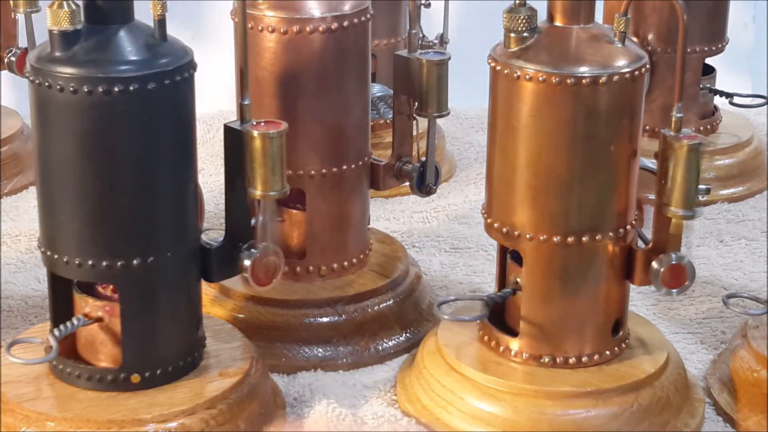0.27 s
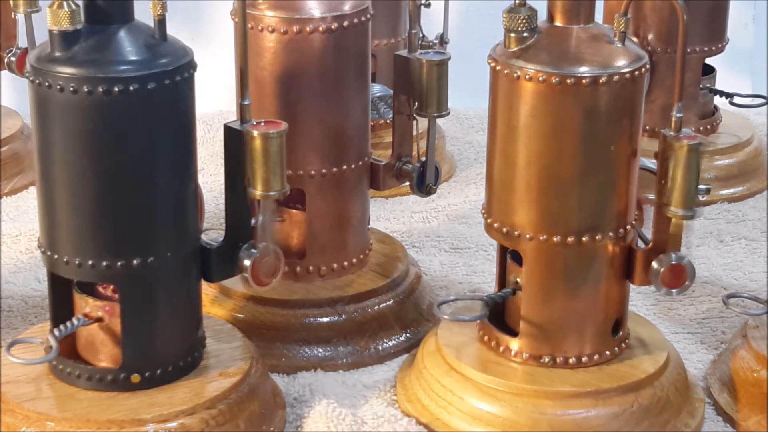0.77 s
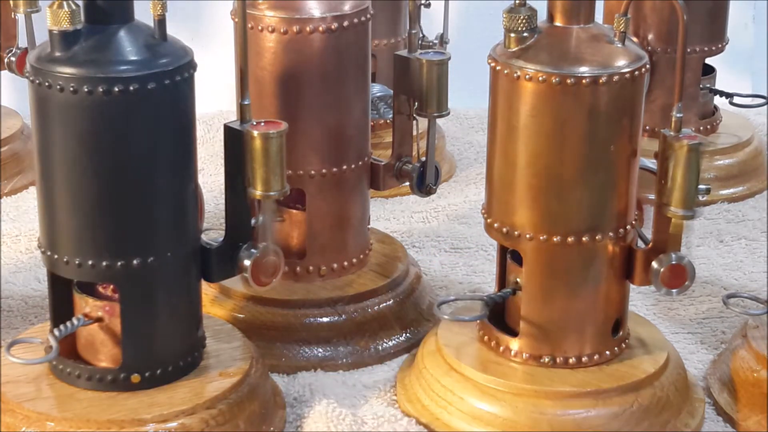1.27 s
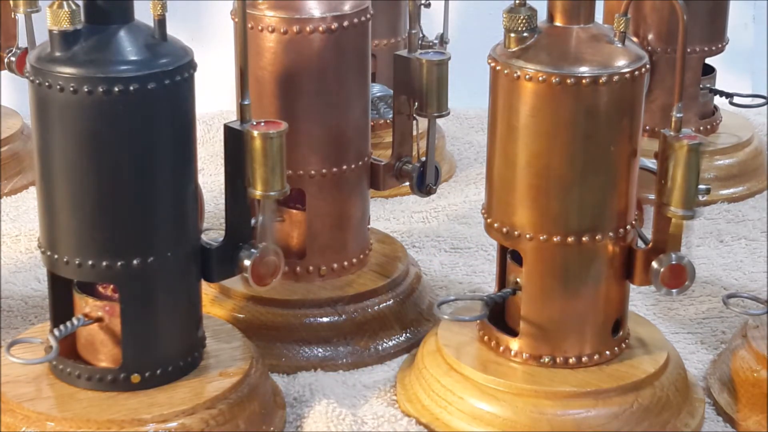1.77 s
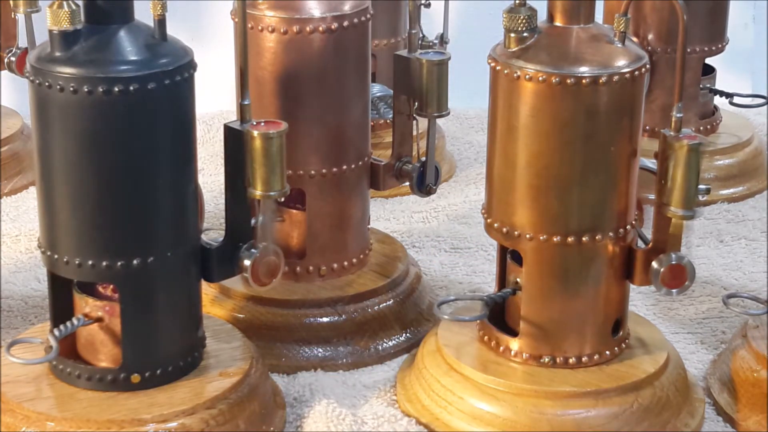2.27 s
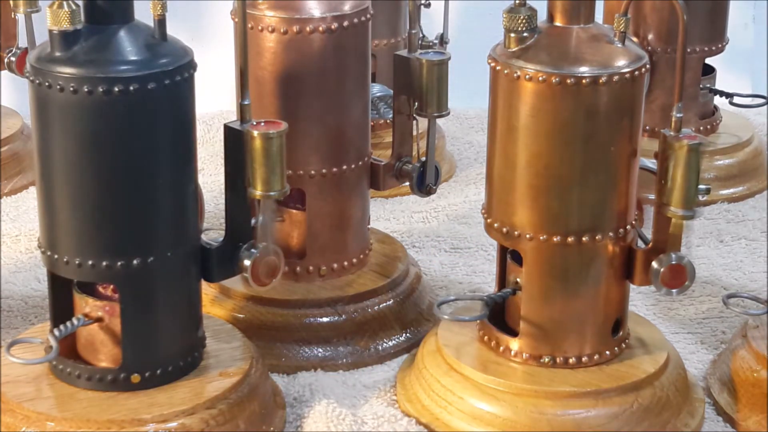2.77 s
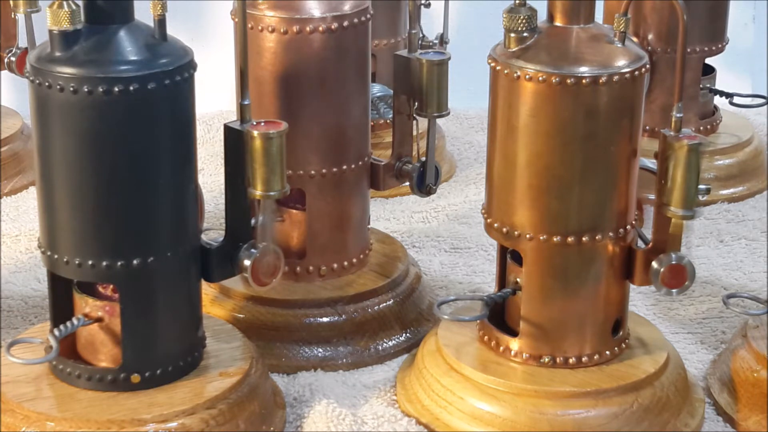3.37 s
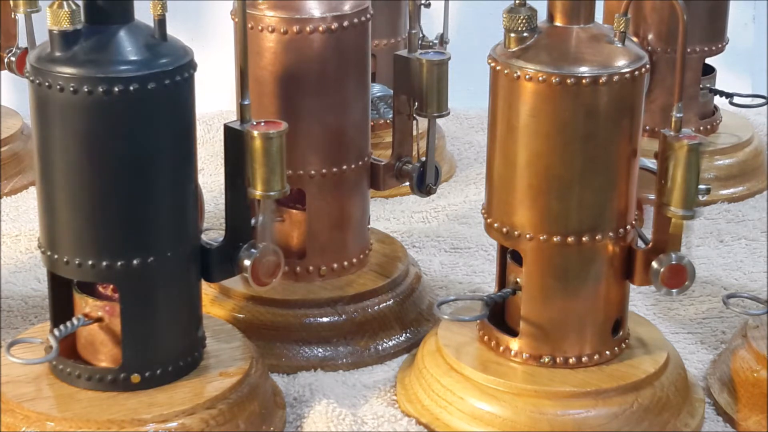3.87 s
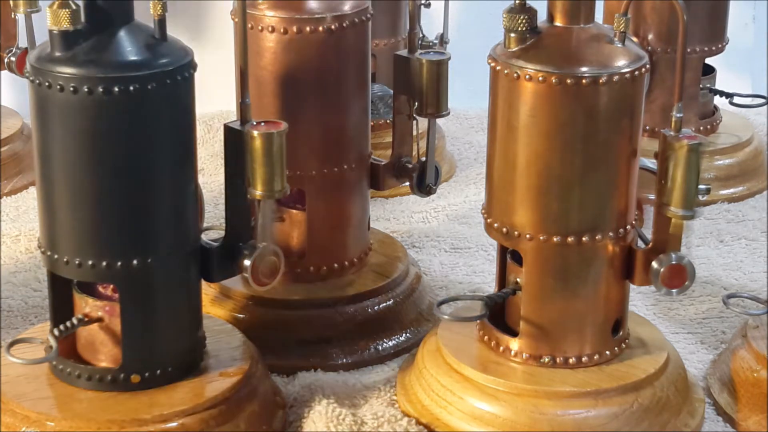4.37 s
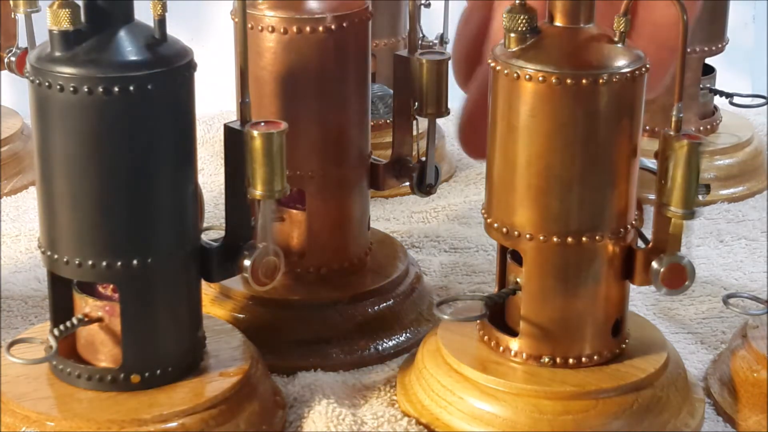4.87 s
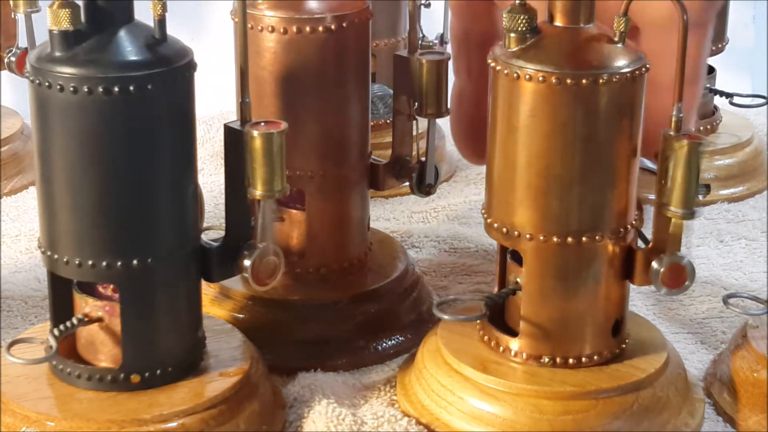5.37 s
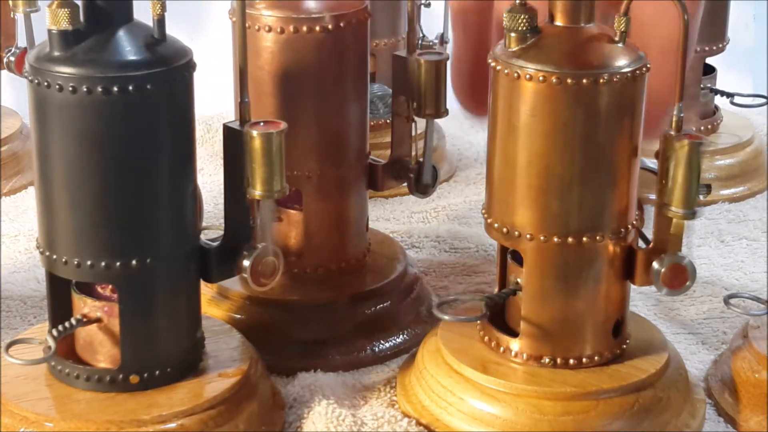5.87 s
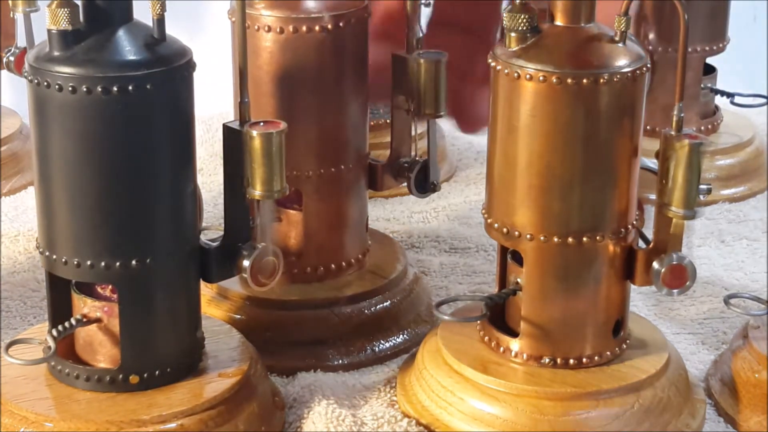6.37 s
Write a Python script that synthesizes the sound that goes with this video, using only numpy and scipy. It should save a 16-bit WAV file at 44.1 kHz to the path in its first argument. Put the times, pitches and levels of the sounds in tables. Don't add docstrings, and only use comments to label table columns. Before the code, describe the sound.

Small model steam engines hiss and sputter steadily with a rapid metallic chatter, while nearby hands click, snap, knock and drag parts on a table.

```python
import sys
import numpy as np
from scipy import signal
from scipy.fft import rfft, irfft
from scipy.io import wavfile
from scipy.ndimage import uniform_filter1d

SR = 44100
rng = np.random.default_rng(int(sys.argv[2]) if len(sys.argv) > 2 else 0)


def decibels_to_gain(level_db):
    exponent = np.asarray(level_db, float) / 20
    return 10 ** exponent


def int16_out(signal):
    q = np.round(np.clip(np.atleast_2d(signal).T, -1, 1) * 32767)
    wavfile.write(sys.argv[1], SR, q.astype(np.int16))


N = 292540


def evened(x):
    return x / np.sqrt(np.mean(x ** 2) + 1e-20)


def read(points, hz):
    f, value = np.transpose(points)
    return np.interp(np.log(hz + 1), np.log(f + 1), value, value[0] - 20, value[-1] - 20)


def follow(rows):
    s, *columns = np.transpose(rows)
    return [np.interp(np.arange(N) / SR, s, c) for c in columns]


def add(mix, s, sound):
    part = mix[round(s * SR):][:len(sound)]
    part += sound[:len(part)]


def ring(x, hz, width_hz):
    return signal.lfilter(*signal.iirpeak(hz, hz / max(width_hz, 10), SR), x)


def steep(x, hz, width_hz):
    y = ring(ring(ring(x, hz, width_hz), hz, width_hz), hz, width_hz)
    return y / abs(y).max()


def filtered(x, order, hz, kind="low"):
    return signal.sosfilt(signal.butter(order, hz, kind, fs=SR, output="sos"), x)


def colour(points):
    log_gain = np.log(decibels_to_gain(read(points, abs(np.fft.fftfreq(4096, 1 / SR)))))
    minimum_phase = np.exp(np.conj(signal.hilbert(log_gain)))
    taps = np.fft.ifft(minimum_phase).real[:2048]
    return taps / abs(taps).max()


def noise(points, patchy_db):
    a, b, patches = rng.standard_normal((N // 128 + 6, 257, 3)).T
    patches = evened(uniform_filter1d(uniform_filter1d(patches, 6, 0), 16, 1))
    slow_bands = uniform_filter1d(rng.standard_normal(a.shape), 3, 0)
    patches += evened(uniform_filter1d(slow_bands, 200, 1))
    hz = np.fft.rfftfreq(512, 1 / SR)
    z = (a + 1j * b) * decibels_to_gain(read(points, hz)[:, None] + patchy_db * patches)
    return evened(signal.istft(z, nperseg=512, noverlap=384)[1][:N])


def pops(spread_db):
    strength = decibels_to_gain(spread_db * np.minimum(rng.exponential(1, N), 4))
    return strength * (rng.random(N) < 900 / SR) * rng.choice([-1, 1], N)


def stroke(s, db, rise_s, fall_s):
    t = np.arange(0, N / SR, .001) - s
    far = np.where(t < 0, -t / max(rise_s, .003), t / max(fall_s, .003))
    return decibels_to_gain(db - 30 * far ** 1.2)


def strokes(rows):
    level = np.sqrt(sum(stroke(*row) ** 2 for row in rows))
    return np.interp(np.arange(N) / SR, np.arange(len(level)) * .001, level)


def turns(engine):
    start, speed = engine
    return start + np.cumsum(follow(speed)[0]) / SR


PUFFER = -.234, [(0, 29.99), (6.64, 31.414)]
WHEEZER = .088, [(0, 19.204), (4.5, 18.957), (6.64, 19.606)]
# time_s, level_db, puff_swell_db, wheeze_swell_db
STEAM = [(0, -53, 1, 2), (.5, -52, 6.5, 7.5), (.9, -52, 8.5, 6.5), (1.65, -52.5, 3.5, 3.5),
         (2.3, -50.5, 5, 3.5), (2.9, -50, 3.5, 0.5), (4.3, -51, 3.5, 6.5), (4.5, -50.5, 6.5, 5.5),
         (5.85, -52, 4, 5), (6.3, -50.5, 6, 5.5), (6.63, -52.5, 7, 5)]
# pitch_hz, level_db [per Hz]
HISS = [(900, -18), (1300, -31.5), (1650, -21), (2400, -19.5), (3400, -20.5), (4000, -24.5), (5400, -30.5),
        (6400, -22.5), (7200, -9), (8100, 1), (9200, -8.5), (11400, -21), (13800, -28.5), (15900, -22)]
# pitch_hz, width_hz, level_db
RIDGES = [(1603, 56, 7), (3380, 350, 1.5), (4860, 580, 6.5), (5880, 180, 5), (5850, 140, -2)]


def steam():
    level_db, puff_db, wheeze_db = follow(STEAM)
    droplets = pops(spread_db=4)
    hiss = noise(HISS, patchy_db=1.4)
    sputter = ring(signal.oaconvolve(droplets, colour(HISS))[:N], 8200, 3000)
    hiss = hiss + decibels_to_gain(-3) * evened(sputter)
    hiss = hiss + sum((decibels_to_gain(db) - 1) * ring(hiss, hz, width_hz) for hz, width_hz, db in RIDGES)
    puff = np.exp(2.5 * (np.cos(2 * np.pi * turns(PUFFER)) - 1))
    wheeze = np.exp(1.8 * (np.cos(2 * np.pi * turns(WHEEZER)) - 1))
    low = ring(ring(hiss, 7880, 1700), 7880, 1700) * (decibels_to_gain(puff_db * puff) - 1)
    high = ring(ring(hiss, 9760, 2500), 9760, 2500) * (decibels_to_gain(wheeze_db * wheeze) - 1)
    return decibels_to_gain(level_db) * evened(filtered(hiss + low + high, 12, 15850))


KNOCKER = -.107, [(0, 24.757), (1.8, 25.732), (3, 26.08), (5.4, 26.306), (6.64, 26.032)]
# time_s, peak_db
KNOCK = [(0, -33), (.3, -37.5), (.9, -40.5), (1.45, -34), (2.0, -35), (2.6, -38.5), (2.95, -35.5),
         (3.5, -36.5), (3.65, -31.5), (3.8, -36.5), (4.1, -40), (4.9, -34.5), (5.6, -36.5), (6.25, -33),
         (6.63, -34)]
# start_s, peak_db
ODD_KNOCKS = [(.964, -42), (1.003, -40), (1.043, -35), (1.082, -44), (1.122, -46), (1.24, -39),
              (1.279, -34), (1.436, -33), (1.631, -32), (1.709, -38), (1.942, -38), (2.02, -32),
              (2.059, -41), (2.097, -40), (2.136, -34), (2.214, -43), (2.6, -33), (2.869, -34),
              (2.945, -38), (3.137, -38), (3.176, -31), (3.252, -34), (3.405, -43), (3.597, -32),
              (3.673, -28), (3.711, -30), (4.055, -44), (4.132, -46), (4.17, -43), (4.208, -44),
              (4.285, -34), (4.323, -32), (4.437, -32), (4.628, -40), (4.666, -33), (4.704, -31),
              (4.742, -40), (4.78, -40), (4.856, -32), (4.895, -31), (4.971, -32), (5.123, -39),
              (5.465, -44), (5.503, -33), (5.541, -33), (5.694, -42), (5.884, -32), (5.923, -31),
              (5.961, -38), (5.999, -43), (6.114, -41), (6.152, -36), (6.19, -31), (6.267, -37),
              (6.305, -31), (6.343, -31), (6.382, -35), (6.42, -32), (6.458, -37), (6.573, -32)]
# pitch_hz, level_db [per Hz]
KNOCK_RING = [(900, -46), (2500, -33), (4600, -28), (5600, -34), (6600, -24), (7300, -7), (7950, 0),
              (8550, -9), (9400, -28), (13000, -48), (20000, -55)]


def knocks():
    at = np.flatnonzero(np.diff(np.floor(turns(KNOCKER))))
    size, shift, bounce, lag = rng.standard_normal((len(at), 4)).T
    hits = np.zeros(N + 400)
    level_db = follow(KNOCK)[0][at] + 1.2 + 1.2 * size
    s, odd_db = np.transpose(ODD_KNOCKS)
    nearest = abs(at[:, None] / SR - s).argmin(axis=0)
    level_db[nearest] = odd_db - 0.5
    at = np.clip(at - 18 + (4 * shift).astype(int), 0, N - 1)
    peak = decibels_to_gain(level_db)
    hits[at] += peak
    rebound_at = at + np.clip(75 + 30 * lag, 25, 300).astype(int)
    hits[rebound_at] += peak * decibels_to_gain(-12 + 3 * bounce)
    return ring(signal.oaconvolve(hits, colour(KNOCK_RING))[:N], 7800, 3600)


# pitch_hz, t60_s
ROOM = [(150, 0.14), (600, 0.19), (2000, 0.21), (5000, 0.21), (9000, 0.15), (12000, 0.17), (16000, 0.37)]


def room_tail():
    taps = np.zeros(SR // 2)
    at = np.arange(40, len(taps) - 20, 12)
    at = at + rng.integers(0, 12, len(at))
    taps[at] = rng.choice([-1., 1.], len(at))
    hz, t, z = signal.stft(taps, SR, nperseg=256)
    room_hz, room_s = np.transpose(ROOM)
    t60 = np.interp(np.log(hz + 1), np.log(room_hz), room_s)
    tail = signal.istft(z * decibels_to_gain(-60 * t / t60[:, None]), SR, nperseg=256)[1]
    tail *= np.minimum(.55 + np.arange(len(tail)) / SR / .035, 1)
    tail = filtered(tail, 14, 15800)
    return tail / np.linalg.norm(tail)


def struck(direct, room_db, wall_db):
    out = decibels_to_gain(room_db) * signal.fftconvolve(direct, room_tail())
    add(out, 0, direct)
    add(out, .0143, decibels_to_gain(wall_db) * direct)
    return out


# start_s, peak_db, body_db, room_db
SNAPS = [
    (3.9063, -4.5, -20, -5.5),
]
# pitch_hz, level_db [per Hz]
SNAP_TOP = [(3290, -59), (5600, -30), (6440, -19), (8150, 3.5), (9380, 10), (11300, -18), (13600, -25),
            (15300, -17), (16000, -36), (16500, -36)]
# pitch_hz, level_db [per Hz]
SNAP_BODY = [(240, -7), (400, -1.5), (786, 1.5), (1100, -3), (1210, 1), (1690, 1.5), (2200, 4), (3500, 2.5),
             (5200, -7), (6760, -5), (11400, -120)]


def snaps():
    out = np.zeros(N)
    for s, top_db, body_db, room_db in SNAPS:
        add(out, s, struck(decibels_to_gain(top_db) * colour(SNAP_TOP), room_db, wall_db=-9))
        add(out, s, struck(decibels_to_gain(body_db + 4.5) * colour(SNAP_BODY), room_db=-1, wall_db=-8))
    return out


def metal_taps(rows, top, wall_db):
    out = np.zeros(N)
    for s, top_db, body_db, hz, room_db in rows:
        body = steep(signal.unit_impulse(2048), hz, .85 * hz)
        blow = decibels_to_gain(top_db) * top + decibels_to_gain(body_db + 5.5) * body
        add(out, s + 0.0014, struck(blow, room_db, wall_db))
    return out


# start_s, peak_db, body_db, body_hz, room_db
TICKS = [
    (5.695, -60, -58, 1080, -11),
    (5.6955, -34.5, -50, 2700, -5),
    (5.9023, -31.5, -51, 2920, -6.5),
    (6.2813, -28.5, -55, 2420, -6),
]
# pitch_hz, level_db [per Hz]
TICK = [(3530, -51), (6000, -14), (7260, -43), (8280, 15), (8860, 16), (15000, -21), (16500, -38)]


def ticks():
    return metal_taps(TICKS, colour(TICK), wall_db=-22)


# start_s, peak_db, body_db, body_hz, room_db
CLICKS = [
    (0.3148, -46, -45.5, 1650, -10),
    (0.319, -33, -47.5, 2060, -8),
    (0.3252, -43, -68, 1910, -12),
    (0.332, -45, -67, 2430, -10.1),
    (0.3538, -27.5, -51.5, 1420, -26),
    (0.5252, -40, -54, 4100, -15),
    (0.5941, -35, -50, 5130, -16),
]


def clicks():
    return metal_taps(CLICKS, steep(colour(HISS), 8200, 5000), wall_db=-21)


# start_s, peak_db, room_db
FLICKS = [
    (6.283, -22, -24),
]


def flicks():
    out = np.zeros(N)
    for s, db, room_db in FLICKS:
        add(out, s, struck(decibels_to_gain(db) * steep(signal.unit_impulse(512), 10200, 7900), room_db, wall_db=-28))
    return out


# start_s, peak_db, room_db
CLACKS = [
    (3.21, -16, 1),
    (3.2122, -28, -11),
    (3.2183, -22, -5),
]
# pitch_hz, level_db [per Hz]
CLACK = [(88, -37), (150, -25), (288, -27.5), (341, -14.5), (465, -13), (777, -23), (1740, -5.5),
         (2130, -15.5), (3760, -26.5), (5570, -41), (6960, -43), (8260, -18), (9000, -30), (11700, -39),
         (19800, -120)]


def clacks():
    out = np.zeros(N)
    for s, db, room_db in CLACKS:
        add(out, s, struck(decibels_to_gain(db) * ring(colour(CLACK), 1470, 5600), room_db, wall_db=-38))
    return out


# pitch_hz, level_db, t60_s
CLACK_RING = [(1270, -13, 0.18), (1420, 0, 0.24), (1670, 3, 0.17), (1800, -1, 0.15), (1890, -4, 0.14),
              (2245, -14, 0.28), (2440, -15, 0.17)]


def clack_body():
    out, t = np.zeros(N), np.arange(SR // 4) / SR
    body = sum(decibels_to_gain(db - 60 * t / t60) * np.sin(2 * np.pi * (hz * t + rng.random()))
               for hz, db, t60 in CLACK_RING)
    add(out, CLACKS[0][0], decibels_to_gain(-52) * np.minimum(t / .006, 1) * body)
    return out


# start_s, peak_db, pitch_hz, room_db
THUDS = [(0.524, -55.5, 870, -17), (2.765, -58.5, 145, 10), (3.323, -42, 226, -2.5),
         (3.454, -63, 190, 15.5), (3.545, -26, 448, -1), (3.555, -38.5, 531, 7), (3.68, -49, 398, 0),
         (3.683, -56, 1020, -12), (3.741, -54, 455, 4), (3.743, -53, 1110, -1), (3.776, -47, 295, -20),
         (3.957, -50, 338, 6), (4.495, -39, 346, -5), (4.514, -35, 307, 2), (4.581, -27.5, 340, 7),
         (4.612, -37.5, 1063, -3), (4.605, -24, 758, -3.5)]
# start_s, peak_db, pitch_hz, room_db
BONKS = [
    (3.840, -37, 325, -6.5),
    (3.868, -45, 329, -5),
]


def thuds():
    out = np.zeros(N)
    for rows, width_hz in ((THUDS, 206), (BONKS, 51)):
        for s, db, hz, room_db in rows:
            blow = decibels_to_gain(db) * steep(signal.unit_impulse(4000), hz, width_hz)
            add(out, s, struck(blow, room_db, wall_db=-24))
    return out


# start_s, peak_db, pitch_hz, width_hz
BLIPS = [(3.1515, -46.5, 900, 1300), (3.168, -48, 1200, 900), (3.2265, -35, 1800, 450),
         (3.234, -30, 1450, 500), (3.239, -34, 1570, 600), (3.248, -42, 1600, 500),
         (3.5555, -32, 594, 170), (3.583, -39, 594, 200), (3.682, -43, 700, 1000), (3.743, -47, 900, 1220),
         (3.9061, -28.5, 15500, 1200), (3.9073, -17, 8900, 2500), (3.92, -21, 2800, 3000),
         (3.9206, -34, 15200, 1200), (3.9206, -30, 13200, 3000), (3.923, -18, 9000, 2000),
         (3.9235, -43, 15400, 1500), (4.494, -40, 800, 1200), (4.585, -24, 339, 85),
         (4.591, -43, 2160, 160), (4.603, -42, 2070, 160), (4.61, -26, 550, 121), (4.612, -32, 807, 89.5),
         (4.497, -39.5, 805, 100), (4.5, -38, 617, 100), (4.514, -36, 330, 80), (4.629, -35, 194, 60),
         (3.545, -40.5, 282, 130), (3.589, -43.5, 307, 100), (3.843, -43.5, 520, 300),
         (3.217, -40, 610, 202), (3.232, -47, 600, 200), (5.6966, -54, 3930, 1200), (6.267, -63, 346, 400),
         (6.277, -58, 350, 400), (5.697, -52, 2250, 350), (5.6967, -47, 3200, 600),
         (5.698, -40, 8700, 900), (5.699, -56, 15300, 1200), (5.9035, -52, 15400, 1200),
         (5.9053, -56, 2300, 600), (5.9035, -56, 1500, 1500), (4.851, -55, 148, 50),
         (5.02, -56.5, 240, 70), (5.139, -54, 200, 70), (5.22, -57.5, 250, 70), (5.29, -54.5, 197, 60),
         (6.2645, -56, 4650, 500), (6.2815, -47.5, 2390, 350), (6.295, -44, 12500, 6000)]


def blips():
    out = np.zeros(N)
    for s, db, hz, width_hz in BLIPS:
        add(out, s, decibels_to_gain(db) * steep(signal.unit_impulse(3000), hz, width_hz))
    return filtered(out, 10, 16000)


# pitch_hz, width_hz, level_db
TABLE = [(103, 63, -6.5), (131, 22, -4), (159, 21, -4), (201, 67, 1.5), (351, 45, 5.5), (430, 51, -14),
         (602, 46, 2.5), (793, 24, -1), (1102, 22, -15.5), (1660, 91, -33), (2100, 140, -14.5)]
# peak_s, peak_db, rise_s, fall_s, brightness [0-1]
DRAG = [(3.332, -63, 0.025, 0.067, .6), (3.51, -68, .2, 0.024, 0.4), (3.552, -56, 0.0096, 0.1, 0.5),
        (3.82, -60.5, 0.76, 0.079, 1), (3.879, -56, 0.11, 0.15, .05), (3.978, -48.5, 0.056, .1, 1),
        (4.19, -55, 0.29, 0.15, 0.73), (4.386, -44, 0.089, 0.082, 0.96), (4.495, -38, 0.0056, 0.29, 1),
        (4.555, -39.5, 0.12, 0.1, 0), (4.611, -33, 0.086, 0.1, 1)]


def dragging(slips):
    modes = [(hz, decibels_to_gain(db) * evened(ring(ring(slips, hz, 3 * width_hz), hz, width_hz)))
             for hz, width_hz, db in TABLE]
    out = np.zeros(N)
    for *push, bright in DRAG:
        tilt_db = 10 * (bright - 1)
        shake = sum(decibels_to_gain(tilt_db * np.log2(hz / 350)) * mode for hz, mode in modes)
        steady = shake / np.sqrt(uniform_filter1d(shake ** 2, 3000) + 1e-9)
        out += strokes([push]) * steady
    return out


# peak_s, peak_db, rise_s, fall_s
SCUFF = [
    (4.502, -48, 0.029, 0.31),
    (4.61, -41.5, .09, 0.08),
    (4.702, -57, 0.0099, 0.0093),
]
# pitch_hz, width_hz, level_db
SQUEAL = [(8290, 330, -1), (8900, 350, -8), (5300, 260, -27)]


def scuffing(slips):
    grit = slips + rng.standard_normal(N)
    scrape = evened(ring(signal.oaconvolve(grit, colour(HISS))[:N], 10200, 2600))
    squeal = sum(decibels_to_gain(db) * evened(ring(ring(grit, hz, width_hz), hz, width_hz)) for hz, width_hz, db in SQUEAL)
    body = evened(filtered(grit, 5, [870, 2290], "band"))
    return strokes(SCUFF) * (decibels_to_gain(-6.5) * scrape + squeal + decibels_to_gain(-5.5) * body)


# peak_s, peak_db, rise_s, fall_s
RUSTLE = [(.03, -68.5, 0.025, 0.14), (2.282, -59.5, 0.31, 0.061), (2.41, -62.5, 0.21, 0.33),
          (2.802, -63.5, 0.17, 0.081), (2.9, -76, 0.4, 0.45), (3.335, -60, 0.028, 0.074),
          (3.58, -62.5, 0.52, 0.45), (4.2, -66.5, .9, 1.6), (4.498, -57.5, 0.014, 0.078),
          (4.606, -53.5, 0.16, 0.064), (4.81, -66, 0.49, 0.062), (4.87, -64.5, .02, 0.11)]
# pitch_hz, level_db [per Hz]
CLOTH = [(120, -39), (200, -15), (305, -7), (453, 0.5), (903, -3.5), (1660, -5), (2390, -8), (3210, -11),
         (5800, -18.5), (7540, -41), (12800, -120)]


def rustle():
    grain = decibels_to_gain(2 * evened(uniform_filter1d(rng.standard_normal(N), 150)))
    cloth = evened(noise(CLOTH, patchy_db=1.2) * grain)
    return decibels_to_gain(4.5) * strokes(RUSTLE) * cloth


# pitch_hz, level_db [per Hz]
HUM = [(12, -62), (20, -18), (33, -10), (65, -15), (93, 2), (129, -4), (166, 6.5), (367, -9.5), (464, -4.5),
       (555, -10), (1500, -17.5), (1950, -44), (3300, -120)]
# peak_s, peak_db, rise_s, fall_s
SHUFFLE = [
    (.39, -63, 1.4, 1.3),
    (2.0, -59, 0.68, 1),
    (2.34, -56, 0.52, 0.13),
    (3.16, -51.5, 0.58, 1.6),
    (3.78, -46, 0.62, 1.5),
    (4.3, -62, 1.5, 0.56),
    (4.95, -58.5, 1.4, 3.2),
    (5.35, -56.5, 1.7, 1.7),
    (6.6, -54, 1.15, 2.9),
]
# pitch_hz, level_db [per Hz]
MURK = [(120, -24), (200, 1.5), (368, -6.5), (453, -7.5), (647, -6.5), (812, -5), (1600, -27.5),
        (2080, -58), (3520, -120)]


def rumble():
    hz = np.fft.rfftfreq(N, 1 / SR)
    tone = evened(irfft(rfft(rng.standard_normal(N)) * decibels_to_gain(read(HUM, hz)), N))
    lumps = decibels_to_gain(2.2 * np.clip(evened(ring(rng.standard_normal(N), 14, 20)), -2, 2))
    shuffle = strokes(SHUFFLE) * lumps * noise(MURK, patchy_db=3.5)
    return lumps ** 0.98 * decibels_to_gain(-66) * tone + decibels_to_gain(-10.5) * shuffle


def scene():
    blows = snaps() + ticks() + clicks() + flicks() + clacks() + thuds()
    slips = pops(spread_db=0.65)
    table = filtered(blows + dragging(slips) + scuffing(slips), 3, 87.6, "high")
    mix = steam() + knocks() + table + rustle() + rumble() + blips() + clack_body()
    return filtered(mix, 12, 16400)[None]


# start_s, loss_db, lowest_lost_hz
DIPS = [(1.454, -40, 700), (2.312, -18, 600), (2.673, -11, 600), (2.822, -19, 800), (2.911, -19, 600),
        (3.057, -22, 500), (3.377, -22, 300), (3.804, -18, 500), (4.124, -19, 600), (4.188, -22, 500),
        (4.484, -10, 2500), (4.636, -13, 1300), (4.851, -14, 300), (4.934, -20, 600), (6.276, -14, 900)]


def band_dips(x):
    out, hz = x.copy(), np.fft.rfftfreq(4096, 1 / SR)
    gap = np.pad(signal.windows.tukey(780, .9), 1658)
    for s, loss_db, low_hz in DIPS:
        part = x[round(s * SR) - 2048:][:4096] * signal.windows.tukey(4096, .7)
        weak_bands = ((hz > low_hz) & (hz < 6900)) | (hz > 9600)
        weak = irfft(rfft(part) * weak_bands)
        add(out, s - 2048 / SR, (decibels_to_gain(1.2 * loss_db * gap) - 1) * weak)
    return out


# start_s, pitch_hz, level_db
STRAYS = [(2.312, 1940, -65.5), (2.822, 656, -69), (3.057, 2170, -70), (3.057, 1670, -68),
          (3.377, 2170, -67), (3.377, 1090, -65), (3.562, 2100, -58), (3.804, 1030, -57.5),
          (4.124, 980, -63), (4.15, 1600, -67), (4.195, 1160, -65), (4.19, 2160, -66), (4.64, 2100, -55),
          (4.851, 665, -68), (6.275, 2360, -64), (6.275, 4610, -68), (6.275, 650, -68)]


def strays():
    out = np.zeros(N)
    for s, hz, db in STRAYS:
        band = steep(rng.standard_normal(1800), hz, 200)[400:]
        add(out, s - 700 / SR, decibels_to_gain(db) * evened(band) * signal.windows.tukey(1400, .5))
    return out


def low_pass(x):
    return signal.sosfilt(signal.butter(12, 16790, fs=SR, output="sos"), x)


def record(dry):
    mix = band_dips(dry[0]) + strays()
    return low_pass(mix[None] - .0006)


dry = scene()
out = record(dry)
int16_out(out)
```